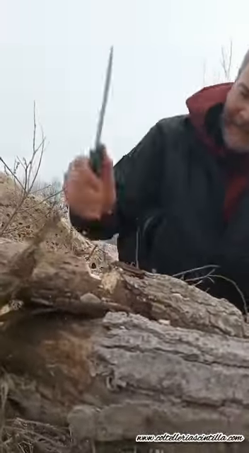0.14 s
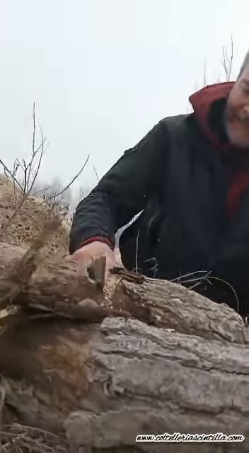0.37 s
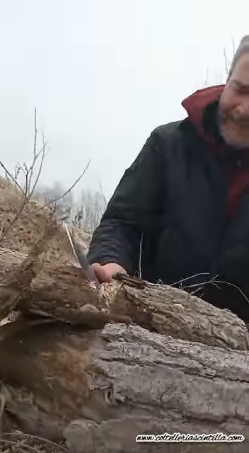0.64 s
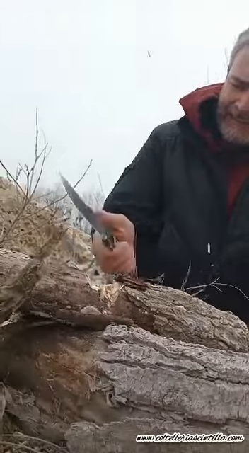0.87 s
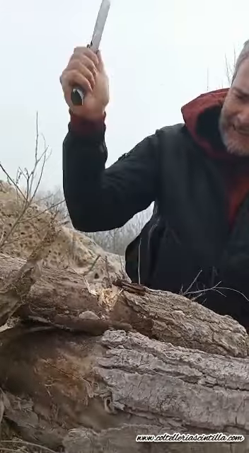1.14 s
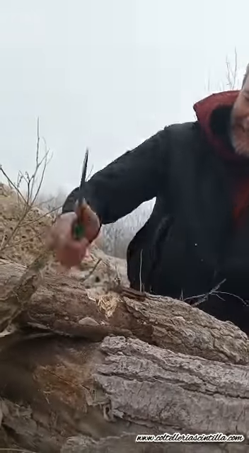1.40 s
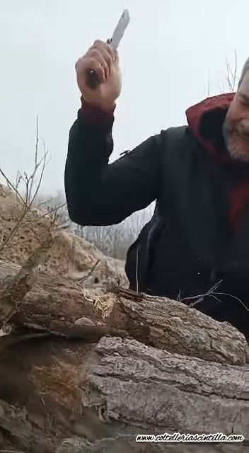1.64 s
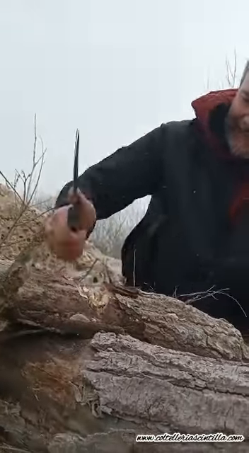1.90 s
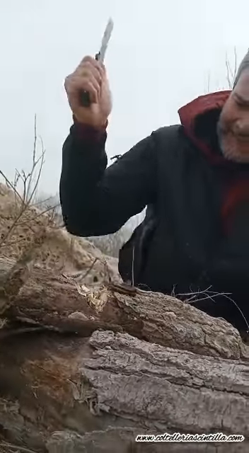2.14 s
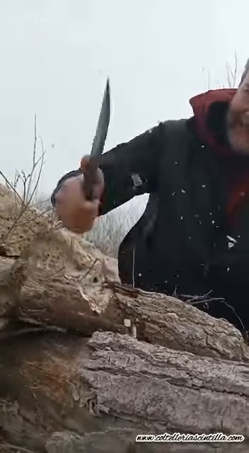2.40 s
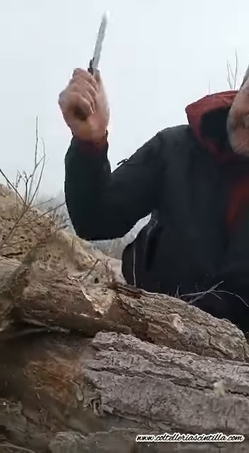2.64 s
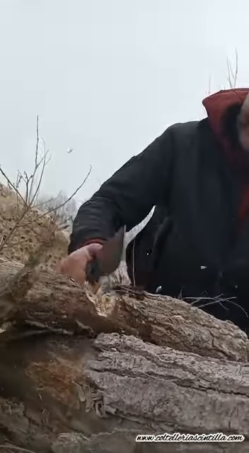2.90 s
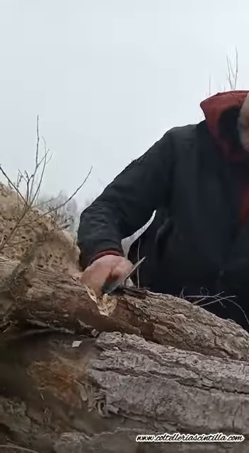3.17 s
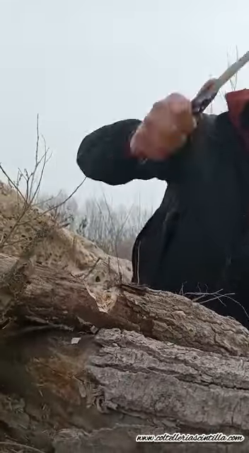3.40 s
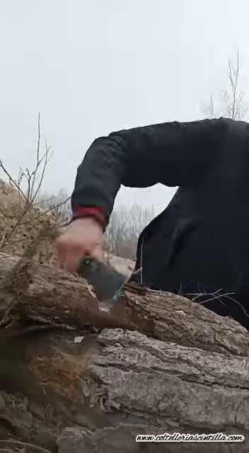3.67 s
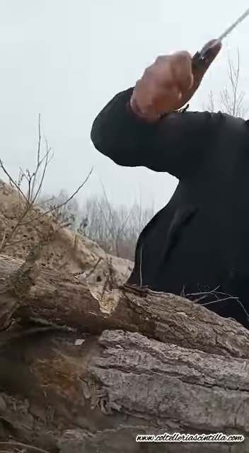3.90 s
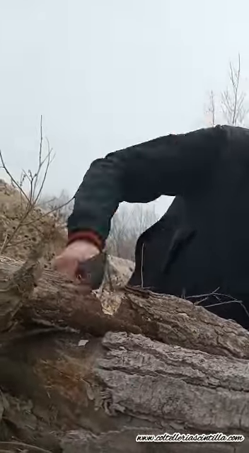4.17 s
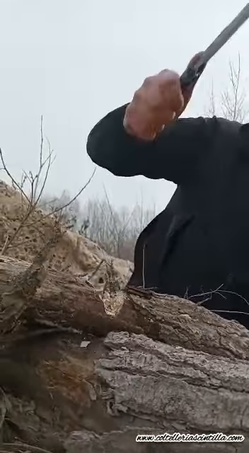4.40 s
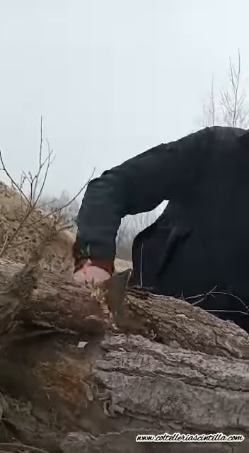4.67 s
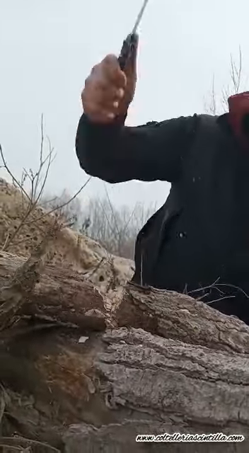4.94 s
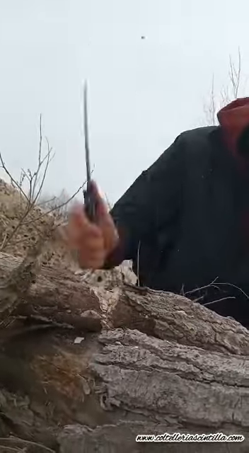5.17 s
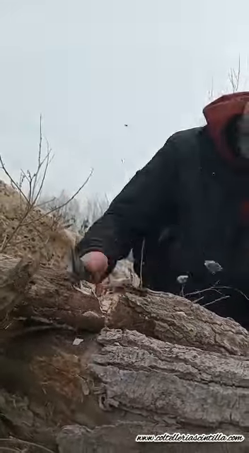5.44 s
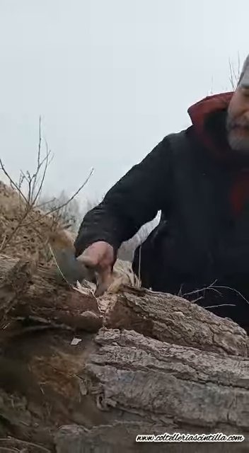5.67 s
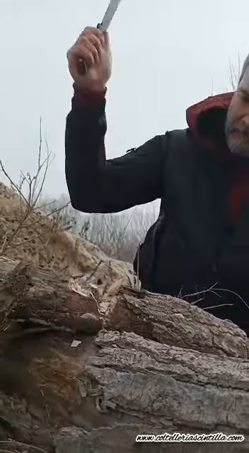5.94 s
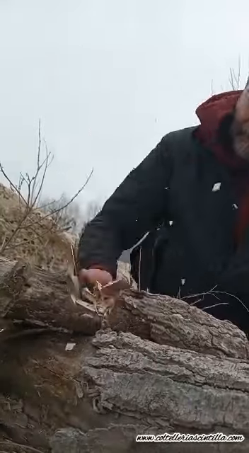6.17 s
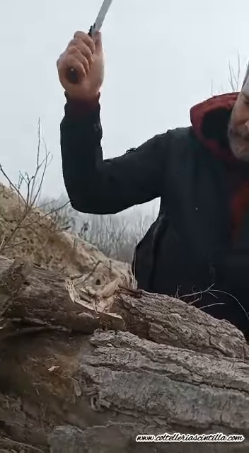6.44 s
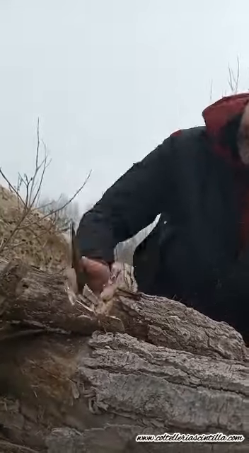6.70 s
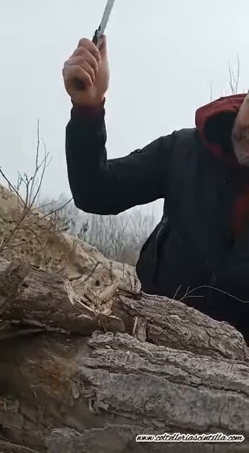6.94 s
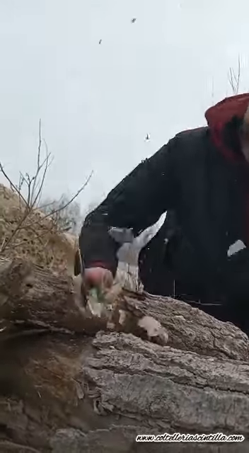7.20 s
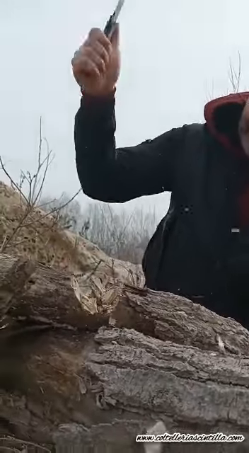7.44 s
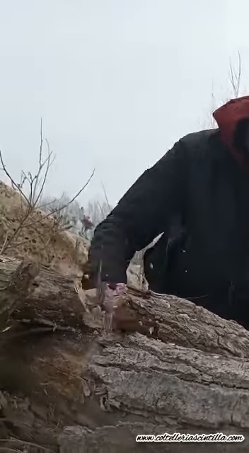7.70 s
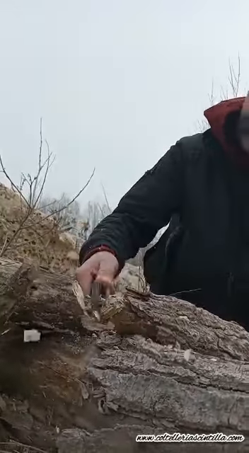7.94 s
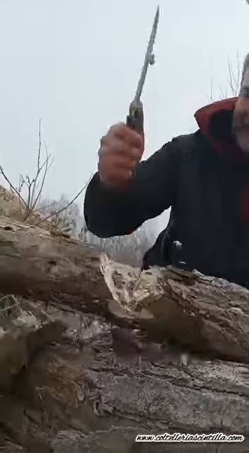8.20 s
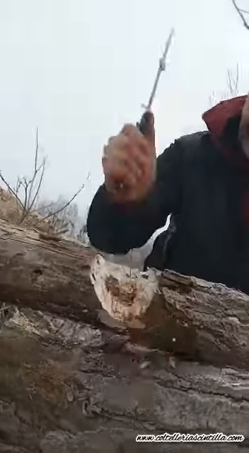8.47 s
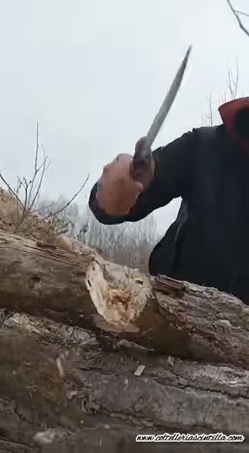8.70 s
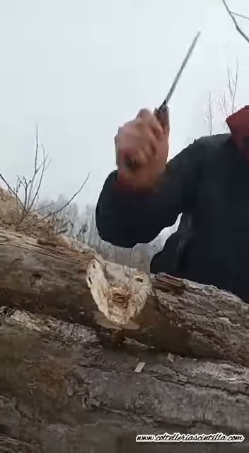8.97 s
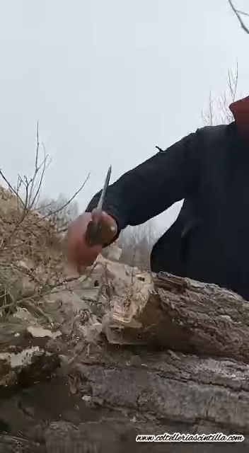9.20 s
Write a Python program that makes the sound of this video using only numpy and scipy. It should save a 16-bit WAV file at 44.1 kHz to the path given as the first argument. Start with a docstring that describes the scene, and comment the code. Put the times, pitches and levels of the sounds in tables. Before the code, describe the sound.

Steady hard chopping into a log, fifteen main blows in a little over nine seconds, with gaps after the first and around six and eight seconds. The cracks are dry and sharp, ending almost at once. Cloth rustles as the arm lifts, bits of bark tick down, and the last blows bring louder debris crunch. Close phone microphone in open air, thin bass, sound ducked around peaks, very quiet rumble beneath.

```python
"""A heavy knife chops a notch into a dry log outdoors, an arm's length from a phone.
Each blow is a burst of cracking noise over decaying log modes: a low thud and a higher knock.
Short noise bursts make chips and scrapes, struck modes make taps, shaky sine tones make the blade squeak.
Shaped noise makes a rustling jacket, crunching splinters, a far rumble and a faint whirr.
The phone's limiter looks ahead and ducks everything just before loud peaks."""
import sys
import numpy as np
from scipy import signal
from scipy.fft import rfft, irfft
from scipy.io import wavfile
from scipy.ndimage import uniform_filter1d, minimum_filter1d

SR = 44100
rng = np.random.default_rng(int(sys.argv[2]) if len(sys.argv) > 2 else 0)


def wav_record(signal):
    """Record a signal, one row per channel, as 16-bit PCM in the file named by sys.argv[1]."""
    frames = np.transpose(np.atleast_2d(signal))
    bounded = np.clip(frames, -1, 1)
    # unit amplitude maps onto the largest positive 16-bit level
    quanta = np.round(bounded * 32767).astype(np.int16)
    wavfile.write(sys.argv[1], SR, quanta)


def boost(x):
    """Linear amplitude factor 10**(x/20) for a level x in decibels (scalar or array-like)."""
    u = np.asarray(x, float) / 20
    return 10 ** u


N = 411894  # length in samples

# Knife blows. Each row: start in seconds, relative level in dB, bite length in ms, thud against the crack
# in dB, treble tilt in dB per octave, pitch in Hz of the log modes that this spot favours.
BLOWS = [(0.5042, 11.5, 3.97, -8, -1.5, 430), (1.5340, 24.5, 2.36, -12, 0, 243),
         (2.0457, 14, 2.83, -17, -5, 262), (2.5345, 13.5, 2.8, -13, -5.5, 290),
         (3.0450, 16.5, 1.04, -14, -1, 363), (3.97, 7.5, 2.78, -7.5, -5.5, 320),
         (4.4734, 11.5, 1.62, -9.5, -8, 261), (4.9727, 13, 2.61, -3, -6.5, 328),
         (5.5059, 14, 6.8, -8.5, -4, 392), (6.3667, 10, 4.7, -14, -0.5, 228),
         (6.8886, 19.5, 3.5, -12.5, -0.5, 230), (7.3853, 19, 4.76, -10, -1.5, 450),
         (7.9160, 4.5, 5.95, -5.5, -6, 380), (8.8160, 4.5, 6, -13.5, -2.5, 476),
         (9.3256, 2.5, 8.6, -6, -2, 474)]
# Modes of the log, low ones its thud and high ones its knock.
# Each row: nominal pitch in Hz, relative level in dB, longest t60 in seconds.
LOG = [(109, -11.5, 0.086), (228, -13.5, 0.073), (259.4, 0.5, 0.039), (303.4, -4, 0.041), (381, -2.5, 0.03),
       (453, -3, .028), (597, -7, .022), (636, 6.5, .022), (800, 10, .022), (915, 17.5, .022),
       (1040, 12, .02), (1173, 10.5, .02), (1286, 17, .016), (1520, 16.5, .016)]
# Loose splinters and bark crunching on the pile. Each row: time in seconds, relative level in dB.
DEBRIS = [(0, -48.5), (.5, -55.5), (.65, -49.5), (1.1, -47.5), (1.5, -54.5), (1.9, -63), (2.9, -52),
          (3.5, -52.5), (3.93, -50.5), (4.15, -74), (5.4, -50.5), (6.0, -56.5), (7.3, -79), (7.9, -49),
          (8.3, -43), (8.6, -36.5), (8.8, -53.5), (8.95, -51.5), (9.05, -31.5), (9.1, -39), (9.14, -32.5),
          (9.34, -31.5)]


def colour(x, points, tilt_db=0.):
    """Minimum-phase filter with the given (Hz, dB) curve; tilt_db leans it per octave above 5 kHz."""
    hz, db = np.transpose(points)
    log_hz = np.log(np.maximum(np.arange(513) * SR / 1024, 1))
    octaves_up = np.maximum(log_hz - np.log(5000), 0) / np.log(2)
    gain_db = np.interp(log_hz, np.log(hz), db) + tilt_db * octaves_up
    # Folding the cepstrum forward makes the filter causal.
    cepstrum = irfft(gain_db * np.log(10) / 20)
    cepstrum[1:512] *= 2
    cepstrum[513:] = 0
    response = irfft(np.exp(rfft(cepstrum)))
    unit_energy = response / np.sqrt(np.sum(response ** 2))
    return signal.fftconvolve(x, unit_energy)[:len(x)]


def add(out, s, sound):
    """Mix a short sound in at time s."""
    i = int(s * SR)
    out[i:i + len(sound)] += sound[:N - i]


def fade(t, t60):
    """Exponential decay, 60 dB in t60 (at least 2 ms)."""
    return np.exp(-np.log(1000) * t / max(t60, .002))


def walk(rate):
    """Random levels, a new one every 1 / rate s, gliding from one to the next; spread near 1."""
    k = int(SR / rate)
    return uniform_filter1d(np.repeat(rng.standard_normal(N // k + 1), k), k)[:N]


def grit(rate, spread_db, smooth_db):
    """Scattered short noise grains, rate per second, of uneven size over even noise; rms 1."""
    uneven = boost(spread_db * np.minimum(rng.exponential(1, N), 3))
    size = (rng.random(N) < rate / SR) * uneven
    # Each grain falls to about a third in 1.3 ms.
    swell = signal.lfilter([1], [1, -np.exp(-1 / (0.0013 * SR))], size)
    swell = swell / np.sqrt(np.mean(swell ** 2))
    x = rng.standard_normal(N) * (swell + boost(smooth_db))
    return x / np.std(x)


def ring(t, modes, chance, push, near_hz=700., focus_db=0.):
    """Decaying sine modes set off by a push, peak 1; the spot struck favours those near one pitch."""
    scatter_db, detune = 2, .04  # spread of each mode's strength, and of its pitch as a fraction
    out = 0
    for (hz, db, t60), (a, b) in zip(modes, chance):
        # The log's lowest mode sounds wherever it is struck.
        away_db = focus_db * (hz > LOG[0][0]) * np.log2(hz / near_hz) ** 2
        envelope = boost(db + scatter_db * a - away_db) * fade(t, min(t60, 12 / hz))
        out = out + envelope * np.sin(2 * np.pi * hz * (1 + detune * b) * t)
    out = signal.fftconvolve(out, push)[:len(t)]
    return out / np.abs(out).max()


def burst(noise, hz, low_db):
    """Two noises: one round its own pitch, one that knocks the log's modes."""
    curve = [(hz / 10.6, -32), (hz / 1.66, -9), (hz, 0), (hz * 1.375, -9), (hz * 6.0, -30)]
    bright = colour(noise[0], curve)
    t = np.arange(1323) / SR
    knock = ring(t, LOG[4:], rng.standard_normal((10, 2)), [1.])
    dull = signal.fftconvolve(noise[1], knock)[:len(bright)]
    return bright + boost(low_db - 12.5) * dull


def rumble():
    """Far-off low noise of the open country, its level wavering slowly."""
    # Spectrum of the rumble. Each row: frequency in Hz, relative level in dB.
    low_curve = [(15, -65), (25, -45), (35, 8), (49, 7.5), (139, -2), (174, -2.5), (249, -9.5),
                 (276, -12.5), (400, -13.5), (520, -14), (880, -120)]
    # Course of the rumble. Each row: time in seconds, level in dB that the waver plays round.
    course = [(0, -52), (.8, -60.5), (1.01, -51.5), (2.36, -60), (2.55, -54.5), (3.3, -54.5), (3.55, -49.5),
              (4.2, -52.5), (4.5, -55), (5.7, -57.5), (6.05, -53), (6.85, -55), (7.1, -58), (8.22, -58),
              (8.69, -53.5), (9.05, -58), (9.34, -47)]
    hz, db = np.transpose(low_curve)
    log_hz = np.log(np.maximum(np.fft.rfftfreq(N, 1 / SR), 1))
    spectrum = rfft(rng.standard_normal(N)) * boost(np.interp(log_hz, np.log(hz), db))
    x = irfft(spectrum, N)
    waver_db = 2 * walk(6)
    level_db = np.interp(np.arange(N) / SR, *np.transpose(course))
    return x / np.std(x) * boost(level_db + waver_db)


def whirrs():
    """A faint narrow whirr far off comes and goes: band-passed noise swelling and fading."""
    # Each row: middle in seconds, half length in seconds, centre in Hz, level in dB.
    swells = [(.22, 0.16, 1830, -66), (1.175, 0.18, 1820, -63), (1.9, 0.14, 1830, -61),
              (2.499, .2, 1860, -65), (3.498, .12, 1660, -61)]
    width_hz = 150
    out = np.zeros(N)
    for s, half, hz, db in swells:
        n = int(2 * half * SR)
        edges_hz = [hz - width_hz / 2, hz + width_hz / 2]
        band = signal.butter(2, edges_hz, "band", fs=SR, output="sos")
        x = signal.sosfilt(band, rng.standard_normal(22050))[:n]
        add(out, s - half, boost(db) * x / np.std(x) * signal.windows.tukey(len(x), .6))
    return out


def rustle():
    """Friction as gritty noise: fine hiss and coarse crunch from jacket and debris, and a woody rub."""
    # The jacket swishes as the arm lifts.
    # Each row: loudest moment in seconds, relative level in dB, dying away in dB per second.
    swishes = [(.13, -38, 54), (.68, -47.5, 30), (1.25, -58, 20), (1.65, -41, 44), (2.24, -40.5, 54),
               (2.74, -40, 50), (3.15, -37, 44), (3.85, -59, 23), (4.03, -44, 36), (4.6, -41.5, 59),
               (5.13, -41, 53), (5.67, -40, 41), (6.2, -53, 40), (6.55, -36.5, 96), (7.06, -38, 52),
               (7.51, -39, 31), (8.12, -40, 77), (8.6, -38, 62), (8.96, -45, 25)]
    # Colours of the three parts. Each row: frequency in Hz, relative level in dB.
    hiss_curve = [(4120, -45), (7000, -37), (7300, -26), (8380, -9.5), (10500, -7.5), (11600, -7),
                  (15100, -29.5), (16000, -23)]
    crunch_curve = [(1180, -32.5), (2000, -13), (2670, -9), (4310, 1.5), (5340, -4.5), (6130, 0.5),
                    (7690, -0.5), (9000, -23), (11700, -34), (19800, -120)]
    rub_curve = [(150, -33), (250, -10.5), (618, -2), (883, -3), (1100, -2.5), (1640, -2.5), (2500, -6),
                 (3250, -7), (5500, -120)]
    rise_db_per_s, round_s = 122, 0.031  # the swish swells fast and has a rounded top
    cloth_crunch_db, cloth_crunch_share = -24.5, 0.59  # cloth's coarse part; dB per dB of swish
    debris_hiss_db, debris_rub_db, rub_floor_db = -2, -11.5, -65
    spray_db, spray_t60_s = -65.5, 1  # splinters thrown by a blow settle; against its level
    swing_db, swing_rise_s = -62.5, 0.4  # the sleeve rubs more as the arm comes down for a blow

    # Envelopes are powers, so that sources add up.
    t = np.arange(0, N / SR + .01, .005)
    swish = 0
    for s, db, fall in swishes:
        away = np.hypot(t - s, round_s) - round_s
        swish = swish + boost(db - np.where(t < s, rise_db_per_s, fall) * away) ** 2
    debris = boost(np.interp(t, *np.transpose(DEBRIS))) ** 2
    swing = 0
    for s, db, *_ in BLOWS:
        swing = swing + (t < s) * boost(swing_db) ** 2 * np.exp(-(np.abs(t - s) / swing_rise_s) ** 2)
        spray = boost(db + spray_db) * fade(np.abs(t - s), spray_t60_s)
        debris = debris + (t > s) * spray ** 2
    hiss_power = swish + boost(debris_hiss_db) ** 2 * debris
    crunch_power = boost(cloth_crunch_db) ** 2 * swish ** cloth_crunch_share + debris
    rub_power = boost(rub_floor_db) ** 2 + boost(debris_rub_db) ** 2 * debris + swing
    hiss_gain, crunch_gain, rub_gain = (np.interp(np.arange(N) / SR, t, np.sqrt(p))
                                        for p in (hiss_power, crunch_power, rub_power))

    flicker_db = 1.5 * walk(40)
    fine, coarse = grit(300, 3, 6), grit(150, 3.5, 4)
    hiss = colour(fine, hiss_curve) * hiss_gain * boost(flicker_db)
    crunch = colour(coarse, crunch_curve) * crunch_gain * boost(flicker_db)
    rub = colour(grit(73, 5.4, 11.0), rub_curve) * rub_gain * boost(flicker_db / 2)
    return hiss + crunch + rub


def squeaks():
    """Fast stick-slip of steel on wood: a harder grip gives a shakier tone with richer overtones."""
    # The blade squeaking in the cut. Each row: start in seconds, length in seconds, glide from Hz,
    # to Hz (before the shake), level in dB that the shake plays round, grip from 0 to 1.
    glides = [(0.562, 0.031, 2570, 2410, -41.5, 0.5), (0.594, 0.017, 1360, 1150, -46.5, 1),
              (0.601, 0.025, 1160, 1670, -50, 1), (0.623, 0.017, 3550, 4150, -31.5, 0.86),
              (.632, 0.014, 1920, 1880, -46, 1), (.633, 0.029, 2670, 2660, -32, 0.28),
              (0.776, 0.027, 2720, 3220, -48.5, 1), (.815, 0.031, 3310, 3500, -39.5, 0.32),
              (0.831, 0.018, 2800, 2850, -49, 0.8), (0.855, 0.018, 3740, 3800, -23, 0.06),
              (0.866, .021, 4270, 4400, -35, .25), (.891, 0.0078, 4300, 4150, -28, 0.28),
              (0.893, .019, 3750, 3590, -25.5, 0.03), (0.899, 0.018, 2830, 2630, -42, 0.5),
              (0.882, 0.042, 4850, 5450, -42.5, 0.85), (0.603, 0.017, 2380, 2950, -37.5, 0.8),
              (0.95, 0.014, 6150, 4550, -25.5, 0.91), (8.072, .045, 718, 770, -49.5, 0.64),
              (8.112, 0.027, 1900, 1970, -39, .05)]
    blade_hz, blade_width_hz, blade_db = 7600, 1400, 10  # overtones near this ring are lifted
    out = np.zeros(N)
    for s, length, from_hz, to_hz, db, grip in glides:
        n, grip = int(length * SR), np.clip(grip, 0, 1)
        shake = uniform_filter1d(rng.standard_normal((2, 4410)), 40)[:, :n]
        pitch_hz = np.linspace(from_hz, to_hz, n) * (1 + 0.092 * grip * shake[0])
        phase = 2 * np.pi * np.cumsum(pitch_hz) / SR
        tone = np.sin(phase)
        for k in range(2, 8):
            if k * from_hz < 12500:
                off_ring = (k * (from_hz + to_hz) / 2 - blade_hz) / blade_width_hz
                lift = boost(blade_db * np.exp(-off_ring ** 2))
                tone = tone + grip * lift * np.sin(k * phase)
        level = boost(db + 28.0 * grip * shake[1]) * np.sqrt(2)
        add(out, s, level * signal.windows.tukey(n, .7) * tone)
    return out


def scrapes():
    """Bumpy swells of friction noise, the briefest heard as ticks."""
    # Scrapes of blade or sleeve over torn wood, and two brief chip ticks at 3.95 and 7.55 s.
    # Each row: start in seconds, length in seconds, centre in Hz, relative level in dB,
    # relative level of the woody low part in dB.
    strokes = [(0.565, 0.022, 7450, -41, -29), (0.588, 0.077, 7950, -26.5, -25),
               (0.745, 0.053, 7000, -41.5, -28), (0.901, 0.02, 9000, -30.5, -18),
               (3.945, 0.022, 8300, -19, -21), (7.546, 0.0087, 2570, -32.5, -21),
               (7.744, 0.044, 6160, -33.5, -26), (8.049, 0.07, 4800, -30.5, -21),
               (8.487, 0.096, 4130, -33, 6), (9.007, 0.031, 4480, -19.5, -27)]
    out = np.zeros(N)
    for s, length, hz, db, low_db in strokes:
        n, noise = int(length * SR), rng.standard_normal((3, 4410))
        bumps = boost(40 * uniform_filter1d(noise[2], 80)[:n])
        add(out, s, boost(db) * burst(noise[:2, :n] * bumps * np.hanning(n), hz, low_db))
    return out


def taps():
    """A short rough contact sets off the log's modes near one pitch."""
    # Blade or large chip tapping the log, and the knock of a light blow at 8.54 s.
    # Each row: start in seconds, peak level in dB, favoured pitch in Hz, t60 of the contact in seconds.
    contacts = [(0.961, -26, 360, 0.013), (2.9148, -40, 1000, .015), (3.2865, -25.5, 710, 0.06),
                (3.778, -42, 1200, 0.017), (6.327, -42, 700, 0.011), (7.731, -31, 1020, 0.023),
                (8.307, -30, 810, 0.036), (8.404, -35, 900, 0.019), (8.482, -38, 900, .015),
                (8.539, -6.5, 830, 0.02), (8.824, -18, 800, 0.06), (8.91, -34.5, 1110, .02),
                (9.0168, -17.5, 1160, 0.018)]
    focus_db = 12  # loss of a mode one octave from the favoured pitch
    out, t = np.zeros(N), np.arange(3528) / SR
    for s, db, near_hz, contact in contacts:
        push = rng.standard_normal(len(t)) * (1 - np.exp(-t / 0.00075)) * fade(t, contact)
        chance = rng.standard_normal((13, 2))
        add(out, s, boost(db) * ring(t, LOG[1:], chance, push, near_hz, focus_db))
    return out


def chips():
    """Each tick is a sharp, dying noise burst; faint crumbs fall at random in between."""
    # Chips, splinters and twigs ticking, the crack of a light blow at 8.53 s,
    # and the second crack of the blow at 8.82 s.
    # Each row: start in seconds, relative level in dB, centre in Hz, t60 of the tail in seconds.
    ticks = [(.399, -26.5, 6100, 0.056), (.47, -23.5, 4800, 0.029), (.473, -33, 2740, 0.045),
             (.6946, -20, 6550, 0.037), (.821, -30, 3530, 0.054), (0.957, -22, 5250, 0.054),
             (1.0385, -21.5, 3070, 0.034), (1.06, -14, 9900, .038), (1.126, -31, 6000, 0.041),
             (1.175, -25.5, 2940, 0.035), (1.195, -23, 8350, 0.066), (1.339, -27, 6760, 0.19),
             (1.4012, -23.5, 5700, 0.029), (1.4524, -28.5, 5450, 0.025), (1.875, -26.5, 4660, 0.017),
             (2.648, -24.5, 11300, 0.02), (2.764, -23.5, 4470, 0.016), (2.8508, -17, 3720, 0.021),
             (2.9145, -28.5, 3140, .023), (2.9876, -25.5, 11100, .029), (3.2226, -29, 11300, 0.027),
             (3.2886, -28.5, 3950, 0.069), (3.487, -26, 7760, 0.032), (3.5152, -28, 7100, 0.013),
             (3.606, -26, 11600, 0.043), (3.6145, -13.5, 11700, 0.019), (3.6582, -22.5, 8700, 0.025),
             (3.7219, -28.5, 7800, 0.029), (3.7772, -20.5, 6600, 0.027), (3.7896, -17.5, 6000, 0.035),
             (3.859, -28.5, 10000, 0.017), (4.3845, -29.5, 6700, 0.065), (4.714, -26.5, 6430, 0.052),
             (4.764, -29, 6030, 0.059), (5.1717, -28, 10900, 0.018), (5.252, -25, 6500, 0.05),
             (5.423, -27.5, 7360, .023), (5.584, -31.5, 2600, 0.052), (5.609, -20.5, 8140, 0.033),
             (5.6512, -23, 6400, 0.031), (5.7347, -34.5, 4000, 0.019), (5.8048, -19.5, 7300, .021),
             (5.86, -28, 11200, .025), (6.107, -29.5, 7500, 0.038), (6.233, -29, 6640, 0.029),
             (6.2838, -27, 5470, 0.023), (6.318, -27, 8500, .017), (6.605, -24, 11000, 0.028),
             (7.0656, -16.5, 6600, 0.02), (7.4147, -25.5, 4140, 0.058), (7.67, -27, 2400, 0.032),
             (7.725, -25, 8700, 0.093), (7.851, -17, 9100, 0.029), (8.0722, -21.5, 4800, .069),
             (8.1115, -22, 4240, 0.035), (8.2012, -17.5, 7200, 0.033), (8.262, -35, 5500, 0.024),
             (8.3, -14, 4440, 0.073), (8.405, -21.5, 9200, .025), (8.431, -26, 4400, 0.053),
             (8.4846, -19, 7000, 0.016), (8.503, -20, 5500, 0.018), (8.516, -8, 4500, .03),
             (8.584, -23, 3300, 0.035), (8.629, -28, 5500, 0.026), (8.976, -24.5, 6100, 0.018),
             (9.008, -12, 8900, 0.046), (9.05, -19.5, 4930, 0.051), (9.15, -20, 5500, .03),
             (8.5263, -2.5, 4100, 0.02), (8.538, 4.5, 3700, 0.036), (8.6857, -17.5, 11100, .021),
             (8.784, -24.5, 6290, .033), (8.8232, 0, 7040, 0.015), (8.8697, -27, 3960, .042),
             (8.9046, -13, 7550, 0.053), (9.0172, -15.5, 4960, 0.052), (9.121, -15.5, 5900, .022),
             (9.1347, -14.5, 8060, 0.077), (9.2404, -13, 6440, 0.067)]
    wood_db = -52  # how little a tick stirs the log, relative
    crumbs_per_s, crumb_t60_s = 8, .024
    crumb_mid_db, crumb_mid_hz = -35, 7000  # crumbs scatter round these
    follow = 0.64  # crumb level in dB per dB of debris

    out, t = np.zeros(N), np.arange(2646) / SR
    count = int(crumbs_per_s * N / SR)
    when, chance = rng.random(count) * N / SR, rng.standard_normal((count, 2))
    busy_db = np.interp(when, *np.transpose(DEBRIS))
    crumb_db = crumb_mid_db + follow * (busy_db - np.median(busy_db))
    crumbs = []
    for s, db, (a, b) in zip(when, crumb_db, chance):
        hz = min(crumb_mid_hz * np.exp(.35 * b), 12000)
        crumbs.append((s, db + 3 * a, hz, crumb_t60_s))
    for s, db, hz, t60 in ticks + crumbs:
        shape = (1 - np.exp(-t / .0002)) * (fade(t, t60) + fade(t, .005))
        noise = rng.standard_normal((2, len(t)))
        add(out, s, boost(db) * 0.62 * burst(noise * shape, hz, wood_db))
    return out


def blows():
    """Fibres burst while the edge bites, duller splinters crackle on; the log thumps as the blade stops."""
    # Colour of cracking fibres. Each row: frequency in Hz, relative level in dB.
    crack_curve = [(880, -2.5), (1500, 1), (2080, -1), (3920, 9), (5380, 3), (6500, 6.5), (8080, 4.5),
                   (9650, -2.5), (11000, 4.5), (11500, 9.5), (13400, -5), (15400, -32), (16000, 3.5)]
    mid_knock_db, knock_follows_thud = -9.5, 0.31  # knock at a thud of 0 dB; dB per dB of thud
    focus_db = 11  # loss of a low mode one octave from the favoured pitch
    out, t = np.zeros(N), np.arange(8820) / SR
    tearing = np.exp(-(t / .016) ** 4)  # the splinters soon stop tearing
    low, high = LOG[:7], LOG[7:]
    for s, db, bite_ms, thud_db, treble_db, near_hz in BLOWS:
        noise, chance = rng.standard_normal((3, len(t))), rng.standard_normal((2, 7, 2))

        # Crack: the bite, then the splinters.
        u = t / (max(bite_ms, .5) / 1000)
        bite = (1 - np.exp(-t / 0.00038)) * np.exp(-u ** 2)
        crackle = boost(-8) * fade(t, .032) * tearing + boost(-36) * fade(t, .08)
        splinter = crackle * np.minimum(u, 1)
        crack = colour(noise[0] * bite, crack_curve, treble_db)
        crack = crack + colour(noise[1] * splinter, crack_curve, treble_db - 3.5)

        # Thud: a short push when the edge wedges, and the log rattling on its pile.
        stop = np.exp(-((t - 0.000783 * bite_ms - .0003) / 0.0002) ** 2)
        shudder = uniform_filter1d(noise[2], 40) * fade(t, 0.085) * np.minimum(u, 1)
        push = np.gradient(stop + 0.093 * shudder)  # the air feels the change of the push
        thud = boost(thud_db) * ring(t, low, chance[0], push, near_hz, focus_db)

        # Knock: fibres give way by jerks.
        jerks = noise[2] * (bite + 5 * splinter)
        knock = boost(mid_knock_db + knock_follows_thud * thud_db) * ring(t, high, chance[1], jerks)
        add(out, s, boost(db) * (0.58 * crack + thud + knock))
    return out


def scene():
    """All sources, one microphone."""
    background = rumble() + whirrs() + rustle()
    details = squeaks() + scrapes() + taps() + chips()
    return (background + details + blows())[None]


def top_cut(x):
    """Nothing passes above the cut-off."""
    return signal.sosfilt(signal.butter(12, 16490, fs=SR, output="sos"), x)


def record(dry):
    """The limiter sees peaks coming, ramps the gain down ahead of them and lets go soon after."""
    bass_hz, top_hz = 91, 15550
    ceiling_db, ratio = -4.6, 7.5
    look_ahead_s, ramp_s, release_s = .027, .013, .006
    # The microphone has little bass.
    dry = signal.sosfilt(signal.butter(3, bass_hz, "high", fs=SR, output="sos"), dry)
    over_db = np.maximum(20 * np.log10(np.abs(dry[0]) + 1e-9) - ceiling_db, 0)
    ahead, ramp = int(look_ahead_s * SR), int(ramp_s * SR)
    # Negative origin: the deepest cut needed soon already holds now.
    held = minimum_filter1d(-over_db * (1 - 1 / ratio), ahead, origin=-(ahead // 2))
    held = uniform_filter1d(held, ramp, origin=(ramp - 1) // 2)
    stay = np.exp(-1 / (release_s * SR))
    released = signal.lfilter([1 - stay], [1, -stay], held)
    gain_db = np.minimum(held, released)
    top = signal.ellip(8, .2, 30, top_hz, fs=SR, output="sos")  # steep end of the treble
    mix = signal.sosfilt(top, dry * boost(gain_db))
    return top_cut(mix)


dry = scene()
out = record(dry)
wav_record(out)
```